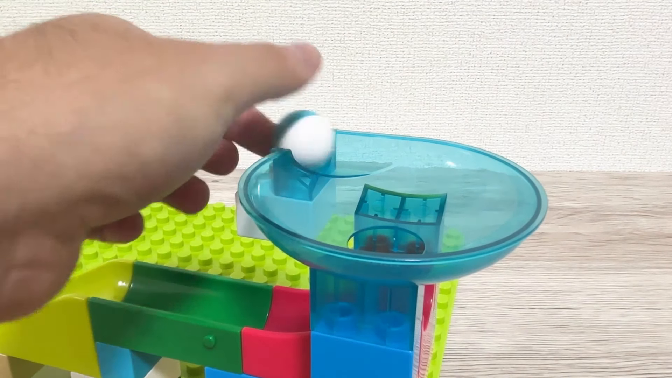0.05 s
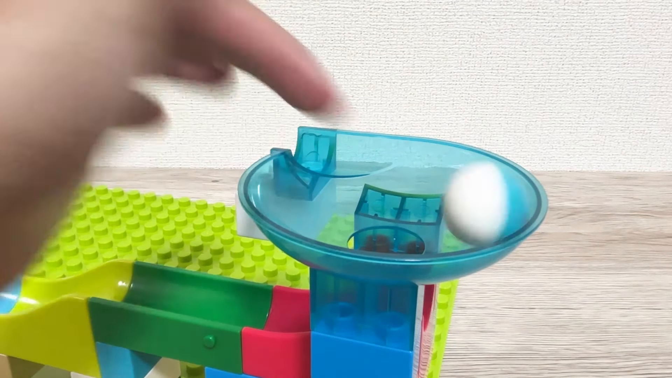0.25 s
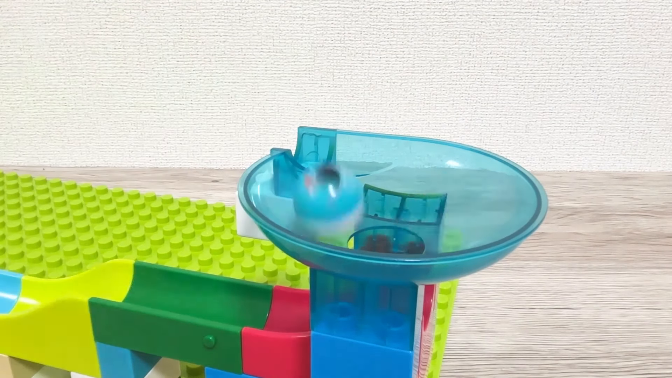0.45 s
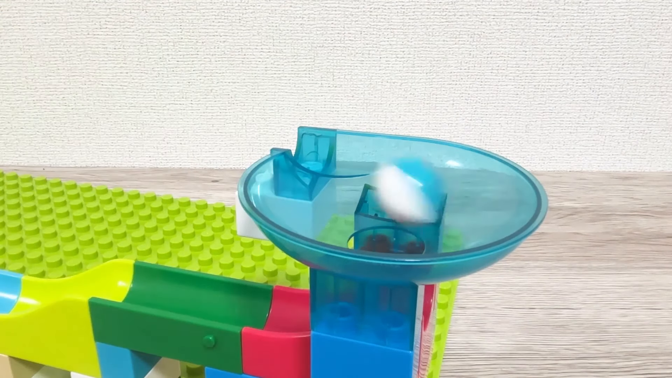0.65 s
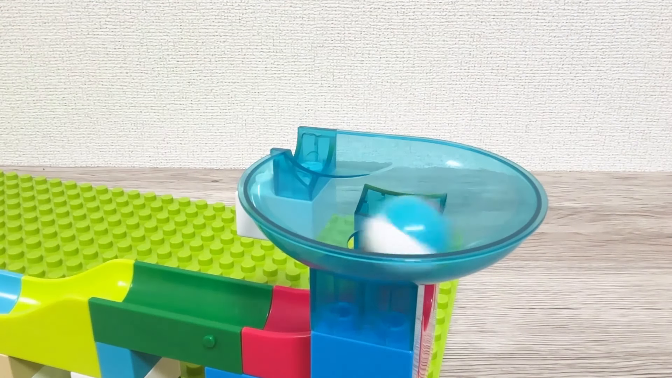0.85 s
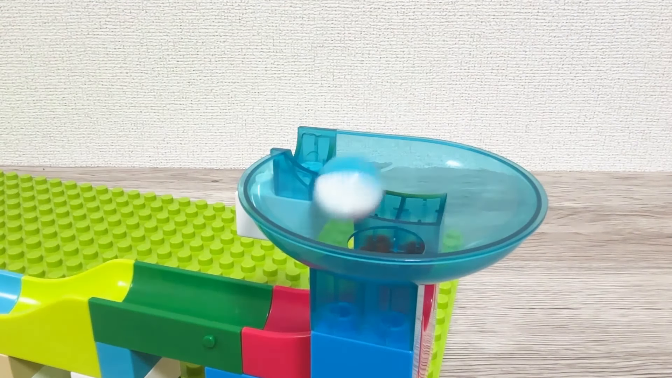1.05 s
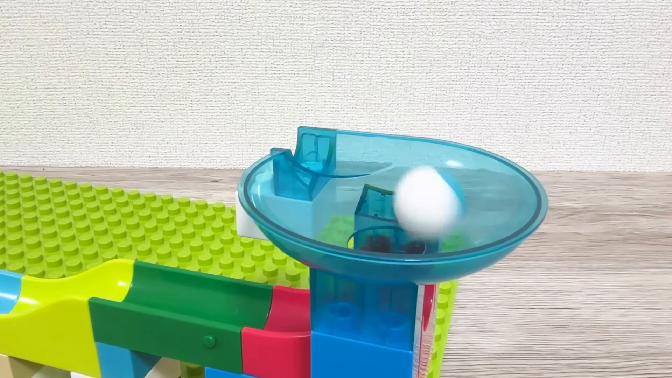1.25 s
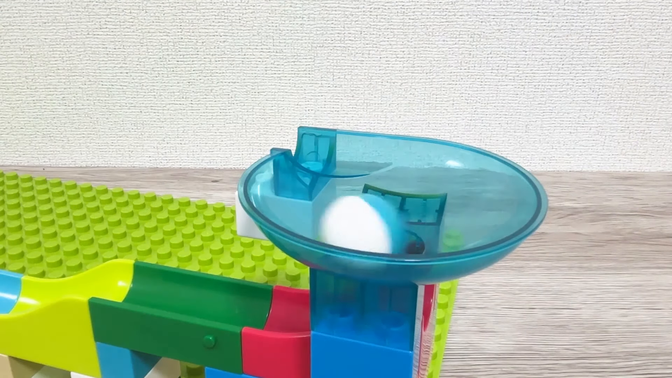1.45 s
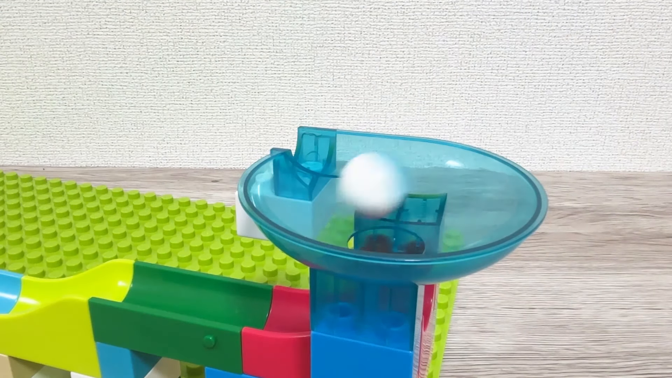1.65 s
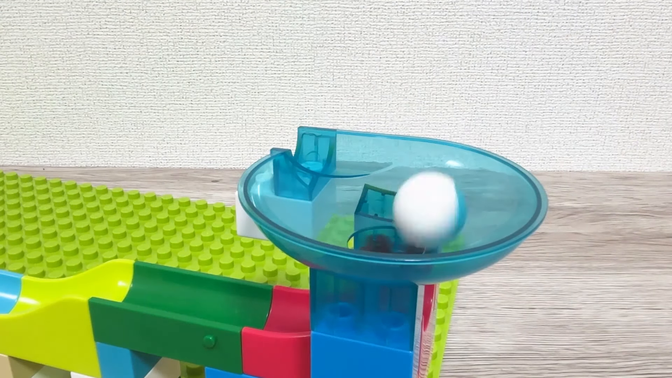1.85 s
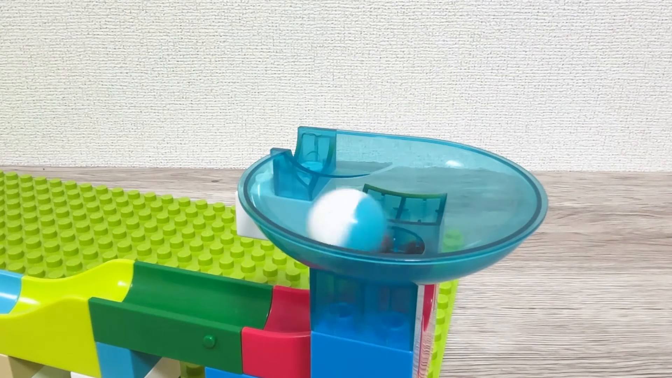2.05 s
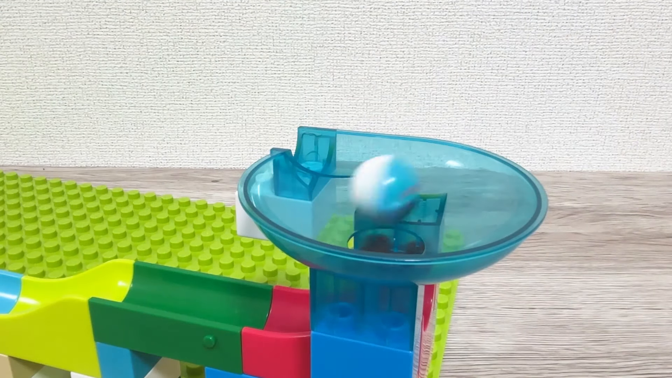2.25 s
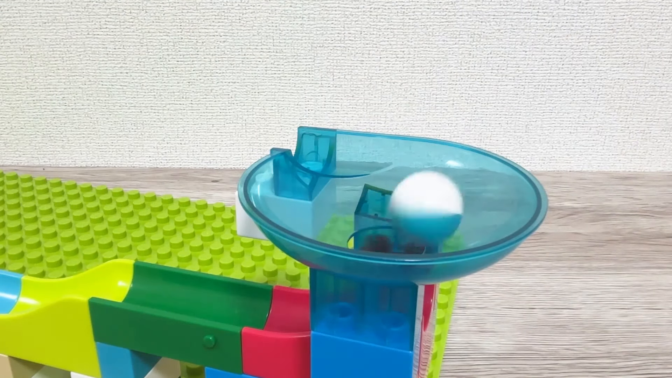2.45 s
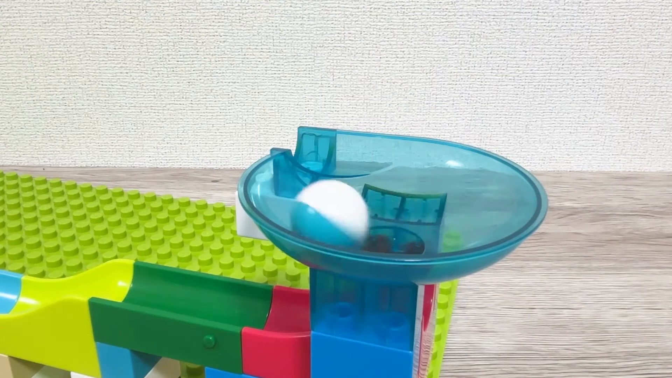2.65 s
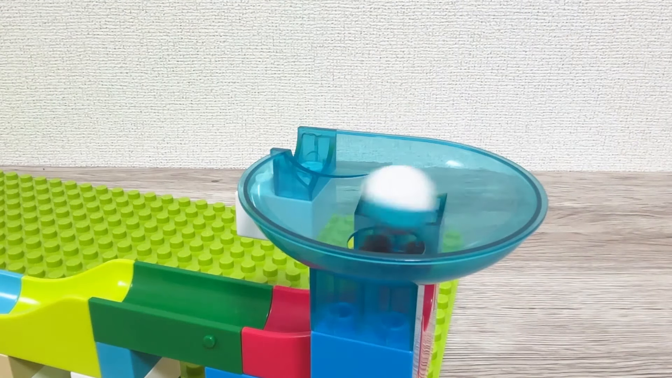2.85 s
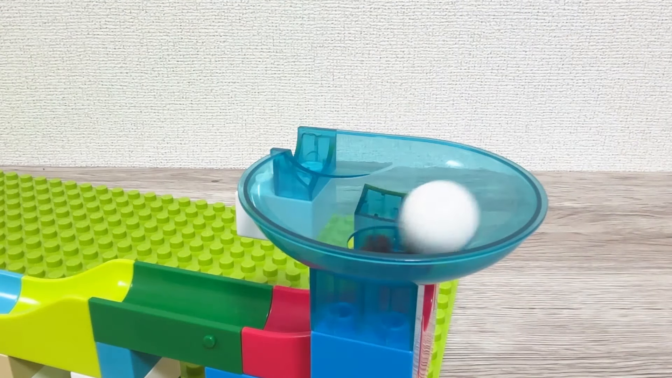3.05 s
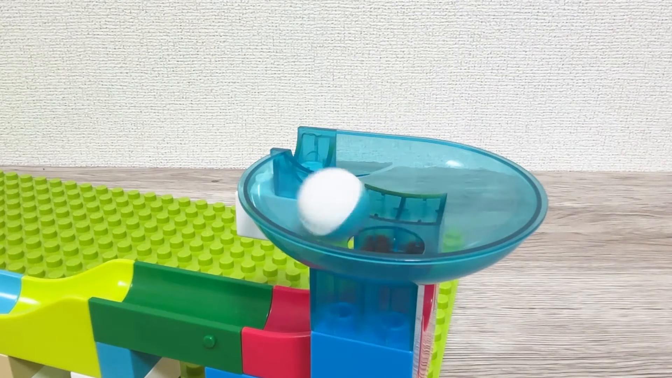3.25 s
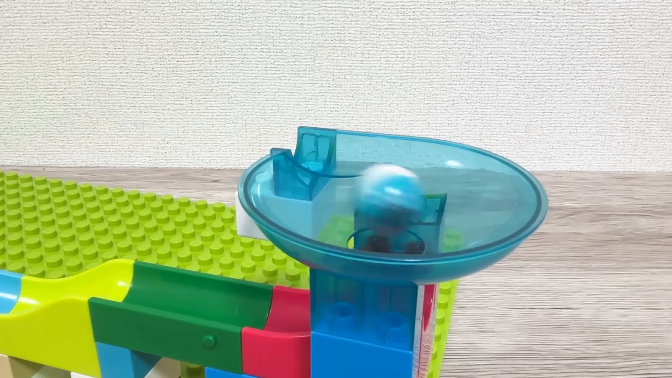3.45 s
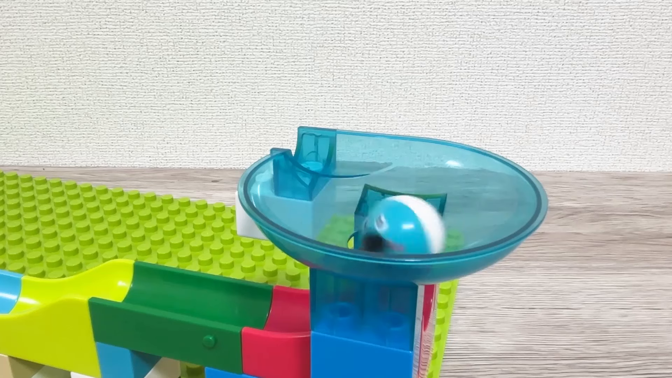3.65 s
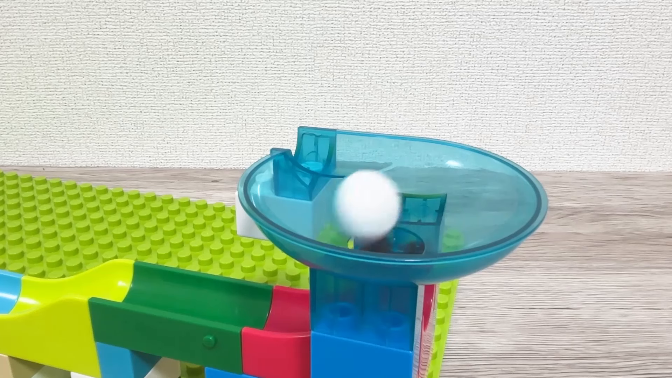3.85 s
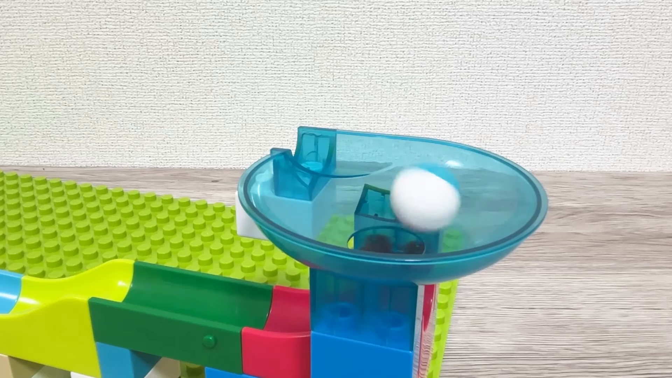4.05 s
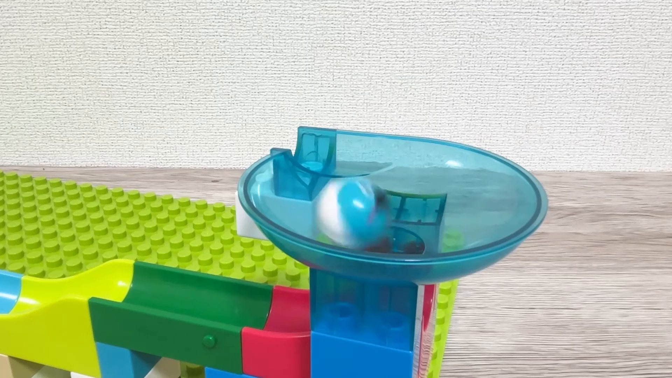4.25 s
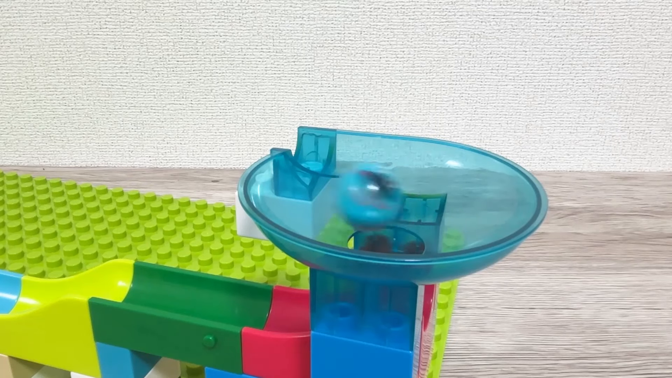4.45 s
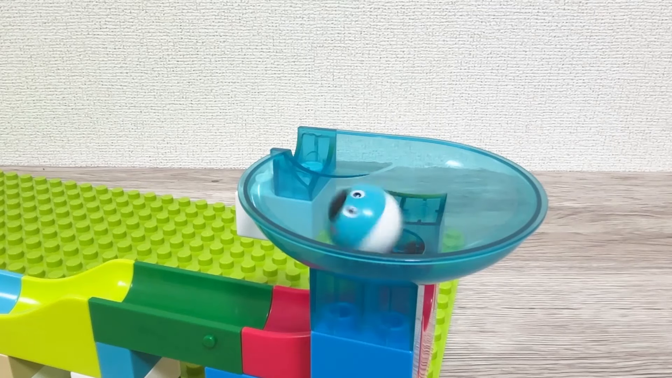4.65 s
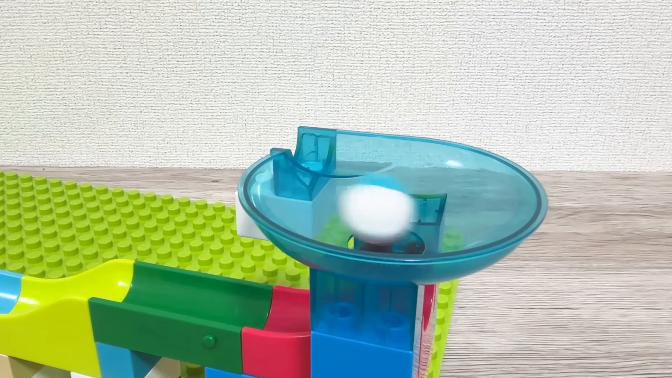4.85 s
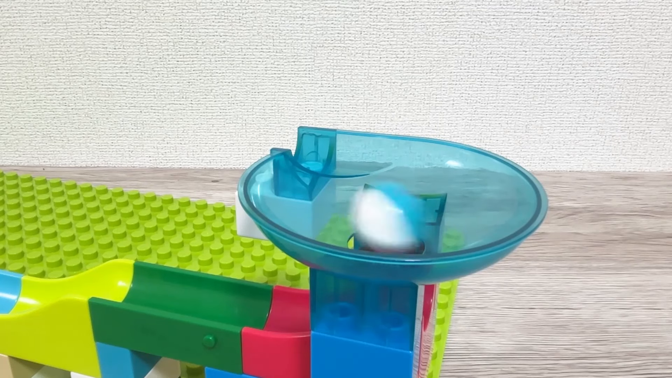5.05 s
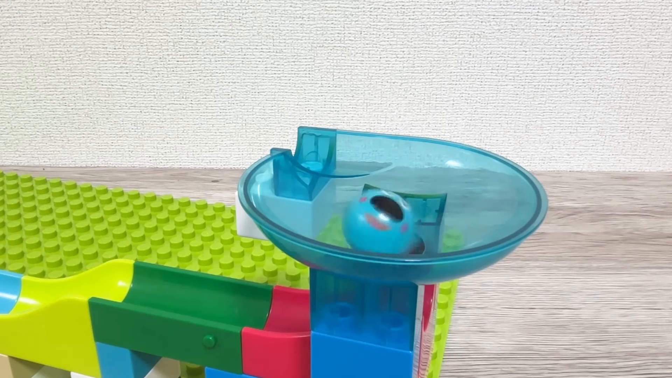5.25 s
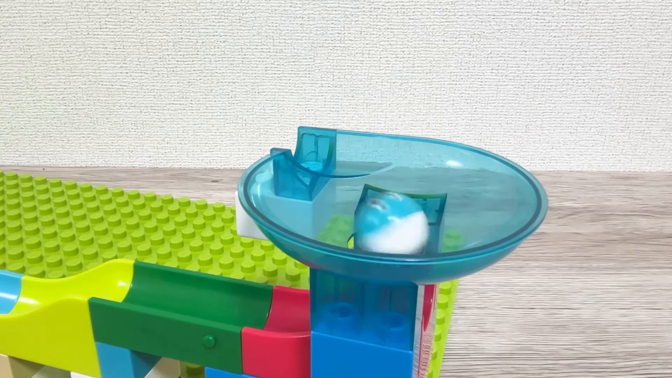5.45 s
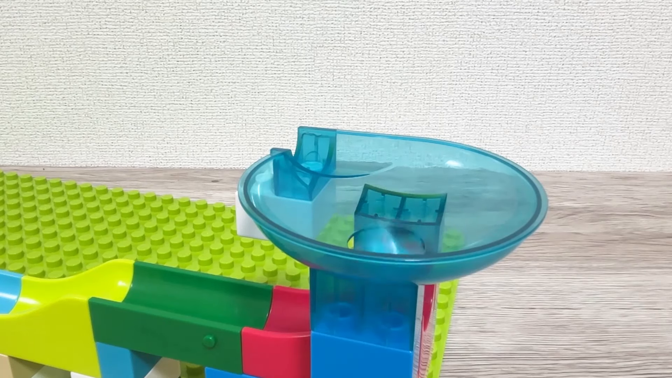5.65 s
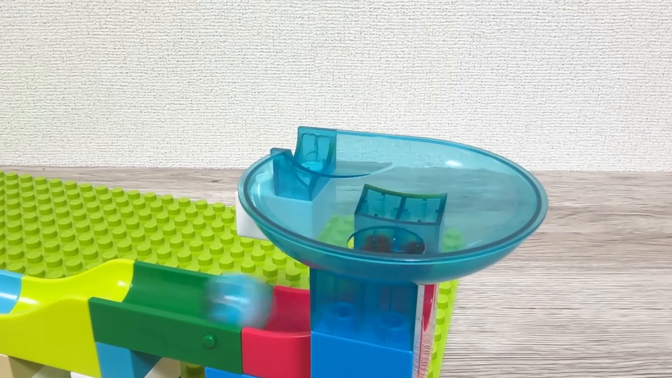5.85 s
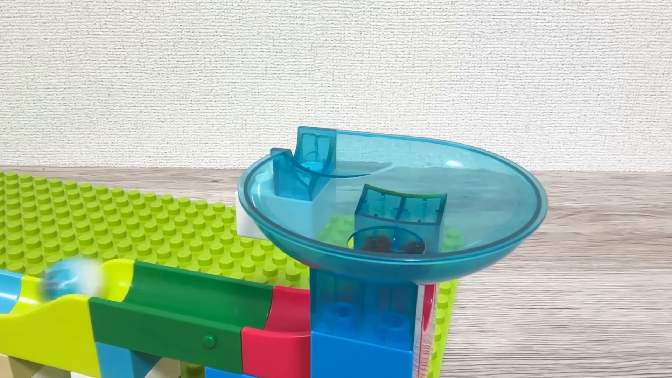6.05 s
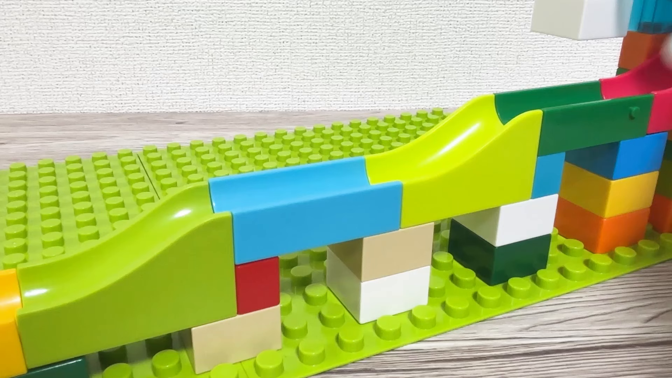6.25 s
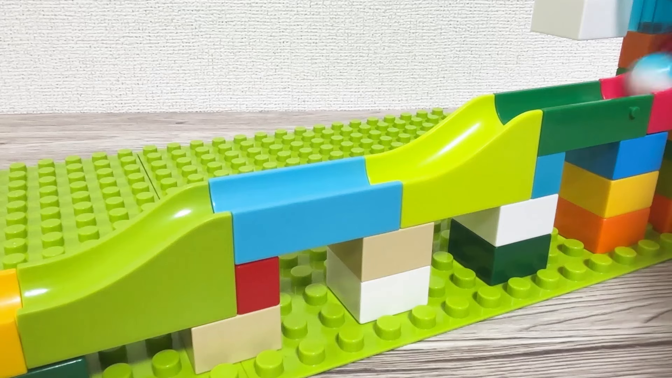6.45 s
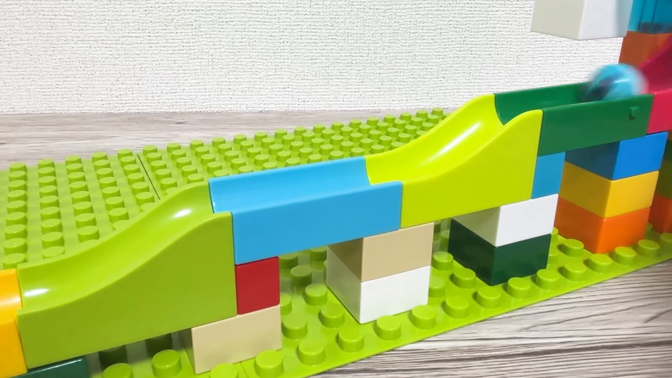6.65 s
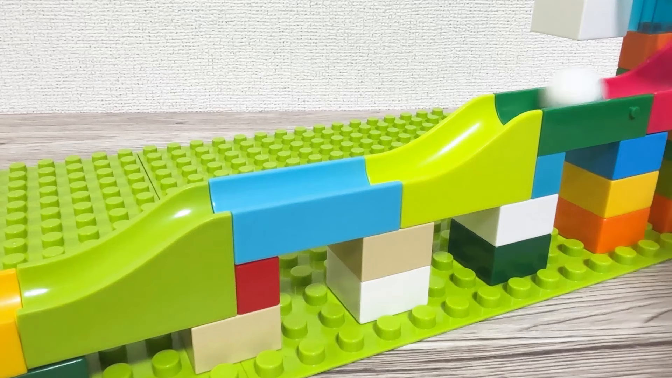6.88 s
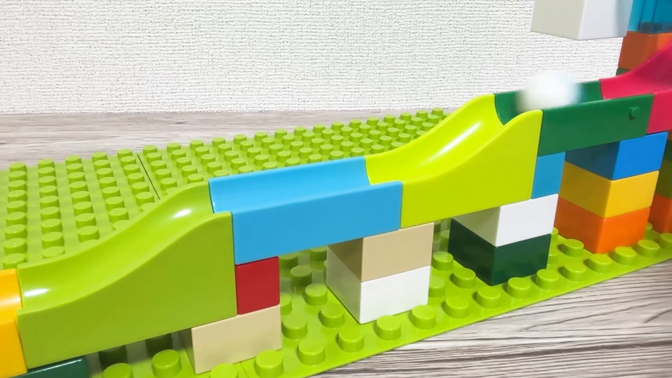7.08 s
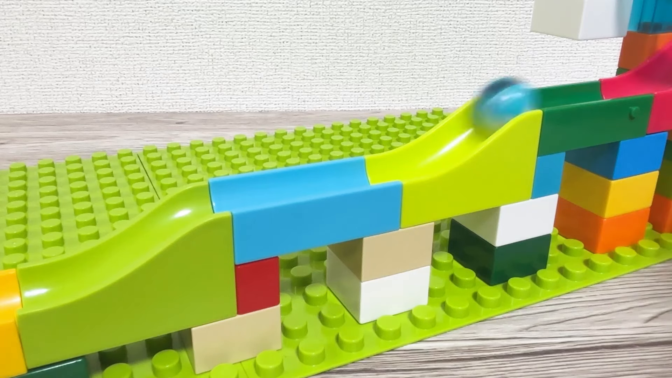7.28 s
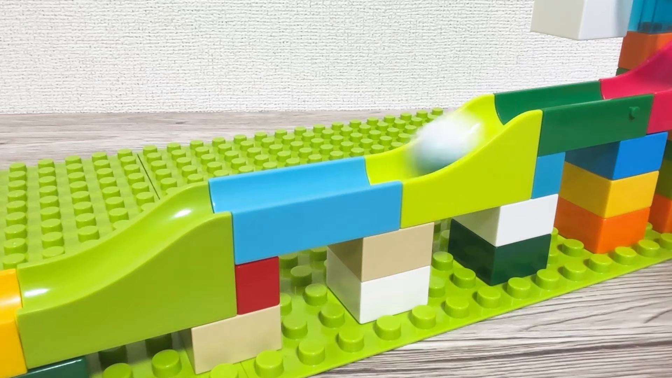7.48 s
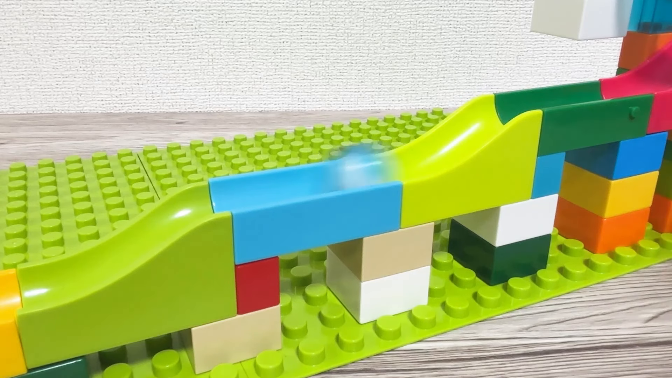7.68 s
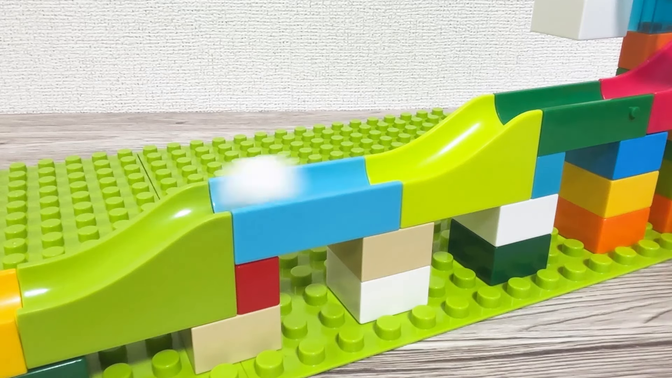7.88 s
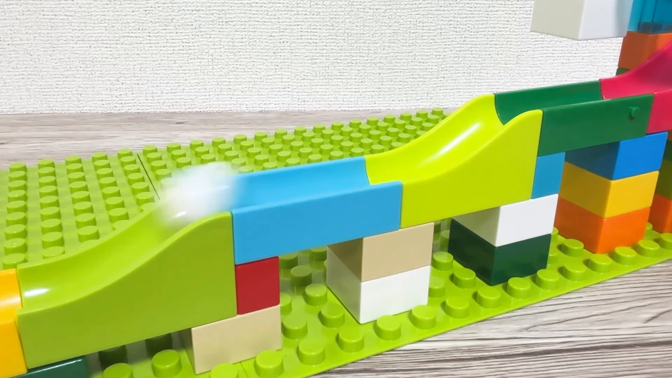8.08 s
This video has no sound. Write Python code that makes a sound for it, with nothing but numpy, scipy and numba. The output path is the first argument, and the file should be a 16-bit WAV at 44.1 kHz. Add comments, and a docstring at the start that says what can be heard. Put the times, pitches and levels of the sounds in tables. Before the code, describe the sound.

Close stereo pickup in a quiet room. A hollow plastic ball hits a plastic funnel with a sharp bright clack and a few bounces, then circles with soft, uneven rolling and faint scrapes. It nears the hole, ticking faster into a dense rattle, drops with loud clacks onto a chute, and the sound abruptly turns to slow motion: low, hollow, muffled knocks and rumbling.

```python
"""Sharp plastic clacks, uneven rolling, sparse lap scrapes, then a dense rattle; at 6.245 s a cut to slow motion:
lower pitches, longer rings and echo. A hollow ball drops into a plastic funnel on a brick tower, circles it
and runs off along a chute. Random knock and rolling forces drive decaying modes of tower, shell, ball and tick;
two microphone ports hear these, a diffuse room echo and wavering room tone.
In slow motion all rates, mode pitches and decays are computed at 0.3 speed."""
import sys
import numpy as np
from scipy import signal
from scipy.fft import rfft, irfft, next_fast_len
from scipy.io import wavfile
from scipy.ndimage import map_coordinates
from numba import njit

SR = 44100
rng = np.random.default_rng(int(sys.argv[2]) if len(sys.argv) > 2 else 0)


def volts(x):
    """Linear amplitude factor 10**(x/20) for a level x in dB, scalar or array-like."""
    e = np.asarray(x, float) / 20
    return 10 ** e


def pcm_store(signal):
    """Save signal as 16-bit PCM."""
    levels = np.round(np.clip(np.atleast_2d(signal), -1, 1) * 32767)
    wavfile.write(sys.argv[1], SR, levels.astype(np.int16).T)


N = 358091


def shaped(points, speed, size):
    """Log-frequency table read on transform bins; its frequencies scale with speed."""
    hz, value = np.transpose(points)
    bin_hz = np.fft.rfftfreq(size, 1 / SR) / speed
    return np.interp(np.log(bin_hz + 1), np.log(hz), value)


def hush(size, speed, level_db):
    """Quiet room tone: shaped noise of wavering level, with bass more alike at the two ports."""
    # room tone spectrum at speed 1: (frequency [Hz], relative density [dB per Hz])
    tone_spectrum = [(13, -38), (22, -5), (95, -9), (420, -19.5), (585, -8), (885, -30), (1070, -40),
                     (1580, -52), (4000, -55), (8260, -43), (12500, -46), (16000, -71)]
    mid, side = rfft(rng.standard_normal((2, size)))
    apart = shaped([(60, 0.15), (400, 0.65), (2000, 0.91)], speed, size)
    both = mid + apart * side * np.array([[1], [-1]])
    tone = irfft(volts(shaped(tone_spectrum, speed, size)) * both, size)
    waver_steps = np.arange(size) / SR * 6 * speed
    waver_db = 1.5 * np.interp(waver_steps, np.arange(60), rng.standard_normal(60))
    return tone / tone.mean(axis=0).std() * volts(level_db + waver_db)


def blows(t, at_s, hard_db, level_db, chatter_ms, speed, flex_hz=None):
    """Knock force: a clean push plus rough micro-bounces; harder blows chatter less and push cleaner."""
    size = 3000
    chance = rng.standard_normal((len(at_s), 2, size))
    force = np.zeros(len(t) + size)
    for k, (fine, grain) in enumerate(chance):
        hardness = volts(hard_db[k])
        decay_ms = max(chatter_ms * (1 - 0.7 * min(hardness / 0.4, 1)), 0.1)  # at speed 1
        age = np.arange(size) * speed / (decay_ms * SR / 1000)
        push = fine * volts(6.0 * grain) * np.exp(-age) * np.clip(5 * age + 0.84, 0, 1)
        push /= np.sqrt(np.sum(push ** 2))
        firm = np.interp(hardness, (0, 0.4), (0.6, 1.6))  # clean push over chatter
        first = np.array([0.5])
        if flex_hz is not None:  # the struck piece gives for 5 of its own cycles, so the clack builds up
            flex_size = int(5 * SR / flex_hz[k])
            cycles = np.sin(2 * np.pi * flex_hz[k] * np.arange(flex_size) / SR)
            first = np.hanning(flex_size) * cycles * 4 / flex_size
        push[:len(first)] += firm * first
        start = max(int((at_s[k] - t[0]) * SR) - len(first) // 5, 0)
        force[start:start + size] += volts(level_db[k]) * push / np.hypot(1, firm)
    return force[:len(t)]


@njit
def ring(x, pole, gain, spot):
    """A bank of decaying modes driven by x; each contact spot has its own row of poles and gains."""
    out = np.zeros(len(x))
    for m in range(pole.shape[1]):
        z = 0j
        for i in range(len(x)):
            z = z * pole[spot[i], m] + gain[spot[i], m] * x[i] + 1e-18
            out[i] += z.imag
    return out


def body(modes, knock, roll, spot, speed, detune, pitch_hz=None, focus_db=0, most_db=0, cycles=70, sides=0.42):
    """Knock force and two-port rolling force through an object's modes, which shift with the contact spot."""
    hz, t60_s, db = np.transpose([m for m in modes if m[0] * speed < SR * 3 / 8])
    t60_s = np.minimum(t60_s, cycles / hz)  # plastic damps well: no mode rings for more cycles
    spots = spot[-1] + 1
    chance = rng.standard_normal((spots, 3, len(hz)))
    omega = 2 * np.pi * hz * (1 + detune * chance[:, 0])
    pole = np.exp(speed * (1j * omega - np.log(1000) / t60_s) / SR)
    if pitch_hz is not None:  # favour modes near the struck piece's pitch; the last mode becomes that piece
        pitch_hz, most_db = pitch_hz[:spots], most_db[:spots]
        octaves = np.log2(hz * speed / pitch_hz[:, None])
        db = db - np.minimum(focus_db * octaves ** 2, most_db[:, None])
        piece_t60_s = 0.022  # at speed 1
        pole[:, -1] = np.exp((2j * np.pi * pitch_hz - speed * np.log(1000) / piece_t60_s) / SR)
        db[:, -1] = most_db - 9.5
        chance[:, 1:, -1] = 0
    gain = volts(db + 3.5 * chance[:, 1])
    gain /= np.sqrt(np.sum(gain ** 2, axis=1, keepdims=True))
    noise_rms = np.sqrt(np.mean(np.sum(gain ** 2 / (2 - 2 * abs(pole) ** 2), axis=1)))
    # the ports see each higher mode from another side, so its phase differs between them
    turn = np.exp(1j * sides * np.minimum(hz / 3000, 1.6) * chance[:, 2])
    sound = [ring(knock + r / noise_rms, pole, gain * side, spot) for r, side in zip(roll, (turn, 1 / turn))]
    # a small object radiates little far below its lowest mode
    highpass = signal.butter(2, 0.56 * hz[0] * speed, "high", fs=SR, output="sos")
    return signal.sosfilt(highpass, sound)


def rolling(t):
    """Rumble and scuff levels in dB: the loudest of even rolling, brief lurches and broad lap scrapes."""
    # even rolling; slip is scuff over rumble: (time [s], shell rumble [dB], slip [dB])
    even_rolling = [(0.15, -75, -0.5), (0.25, -48, -3), (0.451, -58, -4.5), (0.85, -67, -27),
                    (1.3, -61, -6), (2.1, -68.5, -30), (3.3, -88, 0), (4.799, -85.5, 3.5), (5.28, -50, -4),
                    (5.57, -46.5, 7), (5.7, -59.5, 10), (5.83, -54.5, 18), (5.96, -60.5, 0.5),
                    (6.238, -55.5, 0.5), (6.259, -42, -1.5), (6.5, -47, 3.5), (6.73, -58, 4),
                    (7.14, -62.5, -8), (7.499, -49.5, 2), (7.72, -53.5, -0.5), (7.97, -55, -3.5),
                    (8.12, -48.5, 4)]
    # the lopsided ball presses harder for a moment: (time [s], rumble [dB], slip [dB], hold [s])
    lurches = [(0.202, -37.5, 0.5, 0.0038), (0.325, -41, -0.5, 0.0062), (0.682, -57.5, -13.5, 0.0835),
               (0.918, -56.5, -16, 0.183), (1.094, -51.5, -6.5, 0.0086), (1.225, -44.5, -9, 0.0026),
               (1.368, -48.5, -7, 0.0054), (1.43, -50.5, -13, 0.0042), (1.507, -46.5, -7, 0.0027),
               (1.58, -52, -9.5, 0.0028), (1.664, -52.5, -7, 0.0079), (1.771, -62.5, -11, 0.142),
               (1.956, -48.5, -7, 0.0071), (2.11, -63, -9, 0.03), (2.254, -54, -17.5, 0.0199),
               (2.537, -55.5, -20.5, 0.0312), (2.842, -52.5, -20, 0.0271), (2.91, -63.5, -20, 0.0175),
               (3.136, -60, -15.5, 0.015), (3.172, -56.5, -19, 0.0174), (3.468, -50, -24.5, 0.0062),
               (3.589, -57, -12.5, 0.0048), (3.646, -59, -12, 0.0082), (3.741, -54.5, -32, 0.0035),
               (3.834, -54, -3, 0.0029), (3.902, -49.5, -19, 0.0038), (4.188, -49, -9, 0.055),
               (4.542, -47, -9, 0.0584), (4.892, -41.5, -5, 0.0107), (5.072, -43, -4, 0.0507),
               (5.195, -40.5, 8, 0.00234), (5.333, -40.5, 0, 0.0162), (5.412, -36.5, 5, 0.0021),
               (5.605, -43, 8, 0.0294)]
    # ball slides wide and scrapes the wall; width sign is immaterial:
    # (middle time [s], scuff level [dB], time from middle to 6 dB down [s])
    lap_scrapes = [(0.721, -68, -0.61), (1.021, -66.5, 0.0041), (1.27, -63, -0.06), (1.6, -67, -0.07),
                   (1.85, -70.5, 0.19), (2.22, -68.5, -0.1425), (2.5, -69.5, 0.007), (2.83, -73.5, 0.1546),
                   (3.11, -75, 0.1356), (3.24, -75.5, 0.1449), (3.53, -68.5, -0.2319),
                   (3.88, -71.5, -0.2174)]
    s, even_db, slip_db = np.transpose(even_rolling)
    rumble_db, scuff_db = np.interp(t, s, even_db), np.interp(t, s, even_db + slip_db)
    for start_s, db, slip, hold_s in lurches:
        rise_db_per_s = 2500 / (1 + hold_s / 0.012)  # longer lurches rise more gently
        early_db = rise_db_per_s * np.maximum(start_s - t, 0)
        late_s = np.maximum(t - start_s - hold_s, 0)
        rumble_db = np.maximum(rumble_db, db - early_db - 381 * late_s)
        scuff_db = np.maximum(scuff_db, db + slip - early_db - 419 * late_s)
    for middle_s, db, half_s in lap_scrapes:
        scrape_db = db - 6 * ((t - middle_s) / half_s) ** 2
        rumble_db = np.maximum(rumble_db, scrape_db + 3.5)
        scuff_db = np.maximum(scuff_db, scrape_db)
    return rumble_db, scuff_db


def wobble(t, speed):
    """Random level wander in dB, since the rolling is never quite even."""
    steps_s = t[0] + np.arange(400) / 30.34 / speed
    return 3.5 * np.interp(t, steps_s, rng.standard_normal(len(steps_s)))


def grit(level_db, rate_hz, spread_db, alike):
    """Rolling contact: tiny random taps over fine noise, partly different at each port."""
    tap_gain = volts(spread_db * np.minimum(rng.exponential(size=len(level_db)), 3.5))
    taps = (rng.random(len(level_db)) < rate_hz / SR) * tap_gain
    noise = rng.standard_normal((3, len(level_db))) * (1 + taps)
    both = alike * noise[0] + np.sqrt(1 - alike ** 2) * noise[1:]
    return both / both.std() * volts(level_db)


def ports(t, tick, objects):
    """Two-port hearing: a level difference for the main objects, a delay of the left port for the tick."""
    # ball position: (time [s], left minus right level [dB], left treble delay [ms])
    place = [(0, 3.5, -0.074), (5.599, 2.5, -.045), (5.681, 3.5, 0.259), (5.95, 4.5, 0.383),
             (6.241, 6.5, 0.208), (6.25, -7, 0.408), (6.451, 4.5, 0.623), (6.6, -0.5, 0.4835),
             (7.2, 3.5, 0.5746), (8.12, 6, 0.5906)]
    where_s, pan_db, lag_ms = np.transpose(place)
    lag_samples = np.interp(t, where_s, lag_ms) * SR / 1000
    tick[0] = map_coordinates(tick[0], [np.arange(len(t)) - lag_samples], order=3)
    return tick + objects * volts(np.interp(t, where_s, pan_db) * np.array([[0.5], [-0.5]]))


def room(x, speed, wet_db):
    """Diffuse echo, different at each port; octave bands of noise die at their own rates."""
    # echo decay at speed 1: (frequency [Hz], t60 [s])
    echo_t60 = [(100, 0.86), (1000, 0.22), (4000, 0.252), (14000, 0.095)]
    size = next_fast_len(int(0.54 / speed * SR))
    t = np.arange(size) / SR * speed
    octave = np.log2(np.fft.rfftfreq(size, 1 / SR) / speed / 62.5 + 1e-9)
    mid, side = rfft(rng.standard_normal((2, size)))
    apart = shaped([(60, 0.2), (300, 1.0), (1500, 1.0)], speed, size)  # long waves are more alike
    noise = mid + apart * side * np.array([[1], [-1]])
    hz, t60_s = np.transpose(echo_t60)
    tail = 0
    for k in range(9):
        band = irfft(noise * np.clip(1 - abs(octave - k), 0, 1), size)
        tail = tail + band * volts(-60 * t / np.interp(k, np.log2(hz / 62.5), t60_s))
    tail = tail * np.clip((t - 0.004) / 0.0017, 0, 1)  # first walls answer after a few ms
    tail = tail * volts(wet_db) / np.sqrt(np.sum(tail ** 2) / 2)
    return signal.fftconvolve(x.mean(axis=0, keepdims=True), tail, axes=1)[:, :x.shape[1]]


def housing(x, speed):
    """The microphone housing cuts two dips in the treble, moved with the speed."""
    x = signal.lfilter(*signal.iirnotch(15800 * speed, 10.5, SR), x)
    return signal.lfilter(*signal.iirnotch(10100 * speed, 4.5, SR), x)


def shot(t, knocks, chatter_ms, speed, wet_db, thud_db, fizz_db, focus_db, ball_cycles):
    """One run of the ball: knocks and rolling excite tower, shell, ball and tick; then ports and room."""
    # modes at speed 1, all five tables: (frequency [Hz], t60 [s], level [dB])
    tower = [(100, 0.2, -24), (182.16, 0.14, 0), (273.45, 0.12, -2.5), (419.1, 0.029, 5.5),
             (555, 0.039, -4), (624, 0.097, -1.5), (672.4, 0.037, 2)]  # brick tower
    funnel = [(799, 0.04, -2), (886, .045, -15.5), (1092.2, 0.07, -5), (1122.5, 0.16, 8.5),
              (1184, 0.17, -1.5), (1211, 0.24, 1), (1402, 0.07, 2.5), (1369.8, 0.076, 2),
              (1390, 0.024, -17.5)]  # plastic shell
    chute = [(960.5, 0.02, -2), (1148, 0.12, -14.5), (1420, 0.027, -3.5), (1731, 0.013, -7)]  # plastic shell
    ball = [(1960, 0.0084, -7.5), (2225, 0.017, -4), (2380, 0.018, -4.5), (2600, 0.018, -1.5),
            (2893.4, 0.015, 0), (3230, 0.025, -1), (3369, 0.03, 0.5), (3800, 0.0095, 3.5),
            (4113, 0.022, -7.5), (4372, 0.034, 0), (4750, 0.024, 2.5), (5120, 0.0062, -7.5),
            (5770, 0.0077, -0.5), (3000, .016, 0)]  # hollow ball; the last row is replaced by the struck piece
    tick_modes = [(5371, 0.015, -5), (6624, 0.012, -4.5), (8038, 0.016, 2.5), (9104, 0.009, 4),
                  (11209, 0.0066, -3), (12565, 0.0096, -3), (13503, 0.012, -0.5), (16732, 0.0035, -11),
                  (18240, 0.012, -23.5)]  # bright tick of contact
    drop_s = 5.67  # ball leaves the funnel, then knocks the chute

    at_s, clack_db, ring_db, tick_db, pitch_hz = np.transpose(knocks)
    rumble_db, scuff_db = rolling(t) + wobble(t, speed)
    # new contact spot at every knock and, at speed 1, 25 times a second
    moves_s = np.sort(np.r_[t[::int(SR / 25 / speed)], at_s])
    spot = np.searchsorted(moves_s, t + 1 / SR)
    moves_s = np.r_[0, moves_s]
    last = np.maximum(np.searchsorted(at_s, moves_s, side="right") - 1, 0)
    held_hz = pitch_hz[last]  # the last knock's pitch still colours the rolling
    fresh = np.exp(-abs(moves_s - at_s[last]) * speed / 0.04)

    shell_knock = blows(t, at_s, clack_db, ring_db, 1.7 * chatter_ms, speed)
    tower_knock = blows(t, at_s, clack_db, ring_db + thud_db, 5.2 * chatter_ms, speed)
    tower_roll = grit(rumble_db - 1.0, 300 * speed, 7.1, 0.997)
    objects = body(tower, tower_knock, tower_roll, spot, speed, 0.045)
    for modes, on in ((funnel, t < drop_s), (chute, t >= drop_s)):
        if on.any():
            shell_roll = grit(rumble_db, 200 * speed, 3.6, 0.56)
            objects = objects + body(modes, shell_knock * on, shell_roll * on, spot, speed, 0.016)
    ball_knock = blows(t, at_s, clack_db, clack_db, chatter_ms, speed, pitch_hz)
    ball_roll = grit(scuff_db, 250 * speed, 3.7, 0.32)
    objects = objects + body(ball, ball_knock, ball_roll, spot, speed, 0.025, held_hz, focus_db=54.5,
                             most_db=-2.5 + focus_db * fresh, cycles=ball_cycles)
    tick_knock = blows(t, at_s, clack_db, tick_db, 0.68 * chatter_ms, speed)
    tick_roll = grit(scuff_db + fizz_db, 300 * speed, 7.1, 0.59)
    tick = body(tick_modes, tick_knock, tick_roll, spot, speed, 0.03, sides=0.2)

    direct = ports(t, tick, objects)
    heard = direct + room(direct, speed, wet_db) + hush(len(t), speed, level_db=-63.5)
    return housing(heard, speed)


def scene():
    """The full-speed shot, a short cross-fade, then the slowed shot with its lowered top edge."""
    # ball knocks: (time [s], ball clack [dB], shell ring [dB], tick [dB], clack pitch as heard [Hz])
    knocks = [(0.1263, -52, -57.5, -41.5, 2990), (0.1754, -5.5, -14.5, -5, 3517),
              (0.1776, -15, -23, -22.5, 3613), (0.1903, -14, -31.5, -36.5, 2837),
              (0.2586, -28.5, -53, -49.5, 2831), (0.2945, -25, -47.5, -15.5, 3000),
              (0.322, -16, -35.5, -18, 2951), (0.6155, -46, -43, -73.5, 2117),
              (0.6419, -28, -31.5, -32, 2600), (0.9357, -58, -38.5, -43, 2109),
              (1.0302, -42.5, -60, -44, 2928), (1.0881, -45, -38.5, -36.5, 3324),
              (1.209, -49, -33.5, -41.5, 2113), (1.2212, -37, -36, -28.5, 1983),
              (1.232, -40.5, -39, -45.5, 2600), (1.3672, -40, -40.5, -48.5, 2683),
              (1.385, -42.5, -44.5, -48, 2700), (1.4299, -41.5, -38.5, -50, 2780),
              (1.494, -42, -36, -37, 2064), (1.5075, -38, -34.5, -44, 2025),
              (1.58, -52.5, -51.5, -49, 3000), (1.594, -50.5, -46.5, -57.5, 3000),
              (1.6567, -40, -34, -35, 2149), (1.673, -43.5, -36, -45.5, 2200),
              (1.7986, -50, -42.5, -50.5, 2433), (1.9019, -49, -60.5, -41.5, 4750),
              (1.956, -67, -38.5, -46.5, 2318), (2.2595, -72.5, -42.5, -51, 2802),
              (2.2931, -44.5, -42.5, -56.5, 2355), (2.306, -50, -52.5, -63, 2415),
              (2.542, -58, -48.5, -71.5, 2950), (2.846, -57.5, -52.5, -66.5, 2873),
              (3.1413, -62.5, -52, -72, 2905), (3.4356, -72.5, -48, -52.5, 3414),
              (3.4625, -53.5, -49, -52, 2903), (3.468, -60, -43, -58, 2926), (3.544, -54, -59, -56, 4858),
              (3.59, -59, -60, -63.5, 2500), (3.6484, -52, -55.5, -58.5, 2073),
              (3.7276, -60, -44, -52, 2036), (3.8307, -45.5, -71, -34.5, 3166),
              (3.9042, -56, -42.5, -55.5, 2828), (4.1801, -41.5, -50.5, -31, 4701),
              (4.5259, -58.5, -37.5, -47.5, 2942), (4.572, -32.5, -45, -19.5, 4694),
              (4.8663, -49.5, -37.5, -32.5, 3064), (4.8945, -64.5, -38.5, -71, 3810),
              (5.0652, -37, -34.5, -24.5, 2170), (5.0993, -31.5, -41.5, -17.5, 3137),
              (5.203, -36.5, -24.5, -30.5, 2804), (5.221, -32, -36, -36.5, 2877),
              (5.3143, -34.5, -39, -25, 2889), (5.3363, -33, -28.5, -19.5, 2038),
              (5.3892, -30.5, -35, -25.5, 2403), (5.4109, -26, -37, -14, 4271),
              (5.445, -29.5, -39, -30.5, 3000), (5.463, -31.5, -28, -40, 2449),
              (5.477, -27, -36.5, -23.5, 2523), (5.4943, -26.5, -27, -38, 2900),
              (5.5147, -39.5, -27, -43, 2688), (5.5635, -37, -26.5, -44.5, 3440),
              (5.5853, -26, -30.5, -35.5, 2101), (5.6376, -21, -32, -41, 2844), (5.68, -26, -17, -27, 1983),
              (5.685, -13, -15, -1.5, 2051), (5.691, -20, -22.5, -25, 2000), (5.763, -13.5, -14, -13, 3230),
              (5.797, -7, -26, -5.5, 3422), (5.7995, -11, -32.5, -20.5, 3370),
              (5.81, -25.5, -21.5, -33, 3466), (5.8211, -17, -30, -35, 3350),
              (5.8511, -20.5, -51, -11.5, 2734), (5.8669, -20, -35.5, -50, 3358),
              (5.9859, -20, -38, -28.5, 2673), (6.007, -25.5, -41.5, -58.5, 2065),
              (6.0587, -36.5, -51.5, -60, 2665), (6.106, -37.5, -36.5, -33, 2697),
              (6.1377, -28.5, -34, -37.5, 2940), (6.247, -25.5, -36, -64, 774.5),
              (6.297, -13.5, -22.5, -14, 840.6), (6.303, -16, -24, -22.5, 804),
              (6.321, -18.5, -43, -19.5, 925.7), (6.4, -3.5, -15.5, -14.5, 973.8),
              (6.413, -20.5, -37.5, -49.5, 1056), (6.425, -20.5, -40, -45, 1077),
              (6.445, -26, -40, -49.5, 1033), (6.461, -17.5, -24, -55, 902),
              (6.503, -31.5, -45, -48.5, 979), (6.521, -15, -27, -13, 926.5),
              (6.549, -31.5, -40.5, -53.5, 1009), (6.575, -41.5, -28.5, -22, 802.5),
              (6.813, -33, -65.5, -44, 647), (6.882, -43, -44.5, -30, 624), (6.917, -27.5, -31, -33, 742.6),
              (7.054, -21.5, -32, -47.5, 802.4), (7.084, -30, -43, -67, 856),
              (7.261, -32, -37.5, -35, 559.8), (7.304, -16.5, -33.5, -24, 777),
              (7.312, -22.5, -34, -40, 656.3), (7.332, -17.5, -28, -60, 636.5),
              (7.348, -23, -35.5, -44.5, 674.5), (7.413, -26.5, -38.5, -48.5, 767),
              (7.429, -27.5, -26.5, -31.5, 909.3), (7.447, -33, -40, -50, 967), (7.483, -23, -47, -23, 940),
              (7.496, -19, -36, -56, 785.5), (7.5505, -19, -29.5, -21, 1040), (7.699, -23, -41, -27.5, 740),
              (7.734, -30, -37.5, -34.5, 749.8), (7.896, -17, -37.5, -15.5, 877.3),
              (8.006, -29, -38, -32, 869.7), (8.04, -40, -51.5, -37, 752),
              (8.073, -29.5, -37, -33.5, 996.4), (8.08, -24, -39.5, -47, 914.5),
              (8.098, -28.5, -38.5, -47.5, 789.8)]
    cut_s = 6.245
    t = np.arange(N) / SR
    slow_start, full_end = int((cut_s - 0.02) * SR), int((cut_s + 0.02) * SR)
    before = [k for k in knocks if k[0] < cut_s]
    after = [k for k in knocks if k[0] >= cut_s]
    # chatter_ms is the base decay at speed 1, scaled by object and hardness
    full = shot(t[:full_end], before, chatter_ms=6.3, speed=0.9768, wet_db=-7.5, thud_db=-12.0,
                fizz_db=-3.0, focus_db=12, ball_cycles=56)
    slow = shot(t[slow_start:], after, chatter_ms=4.85, speed=0.3, wet_db=-14.5, thud_db=-16.0,
                fizz_db=-5.5, focus_db=13, ball_cycles=60)
    slow = signal.sosfilt(signal.ellip(10, 0.3, 75, 5900, fs=SR, output="sos"), slow)
    fade = np.clip((t - cut_s) / 0.03 + 0.5, 0, 1)
    full = np.pad(full, ((0, 0), (0, N - full_end)))
    slow = np.pad(slow, ((0, 0), (slow_start, 0)))
    return full * (1 - fade) + slow * fade


def roll_off(x):
    """The treble ends steeply here."""
    return signal.sosfilt(signal.butter(12, 16480, fs=SR, output="sos"), x)


def record(dry):
    """The microphone loses the deepest bass and the top."""
    low_cut = signal.butter(2, 40.2, "high", fs=SR, output="sos")
    top_cut = signal.ellip(8, 0.3, 60, 16600, fs=SR, output="sos")
    mix = signal.sosfilt(np.r_[low_cut, top_cut], dry)
    return roll_off(mix)


dry = scene()
out = record(dry)
pcm_store(out)
```